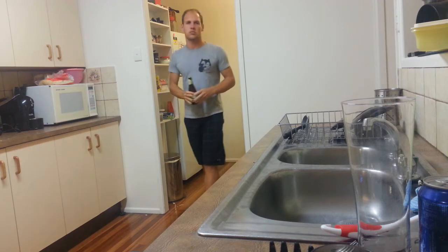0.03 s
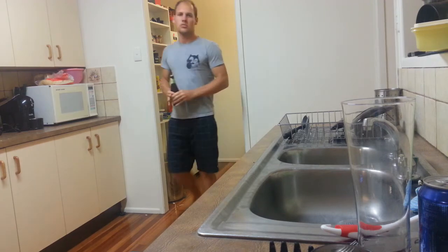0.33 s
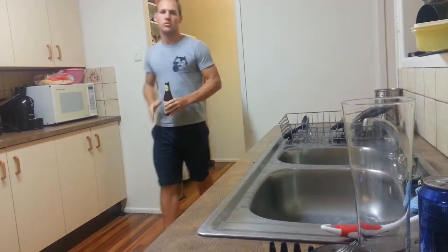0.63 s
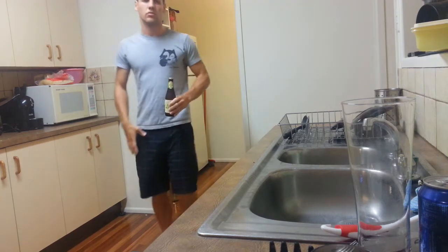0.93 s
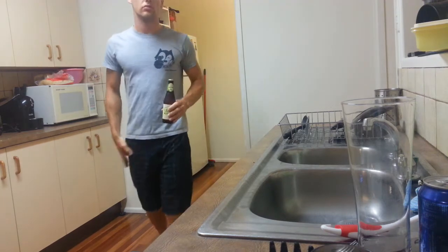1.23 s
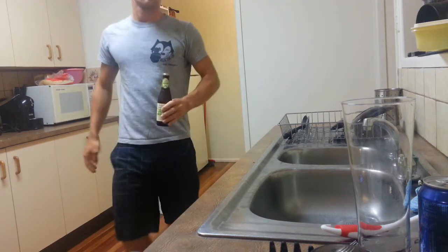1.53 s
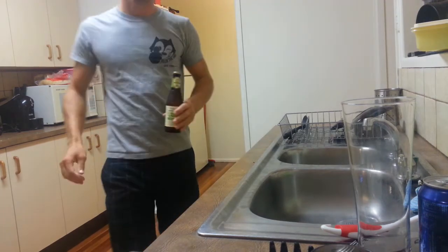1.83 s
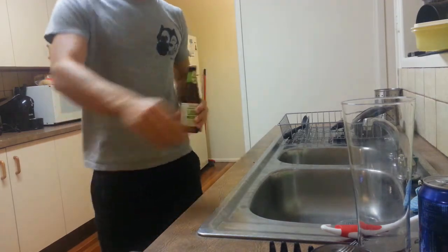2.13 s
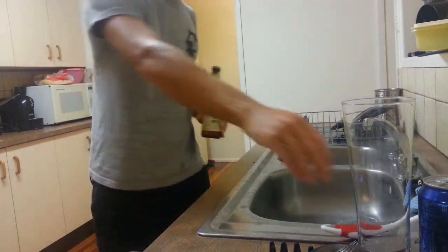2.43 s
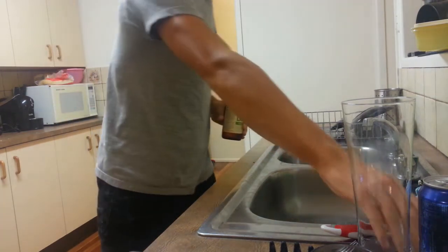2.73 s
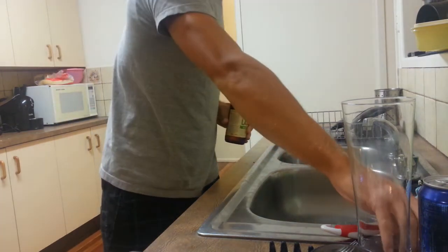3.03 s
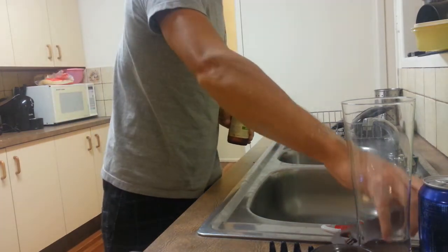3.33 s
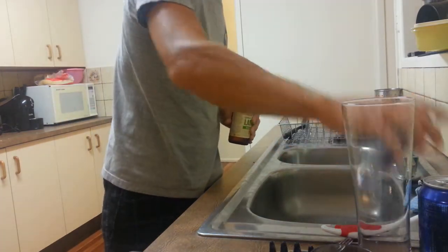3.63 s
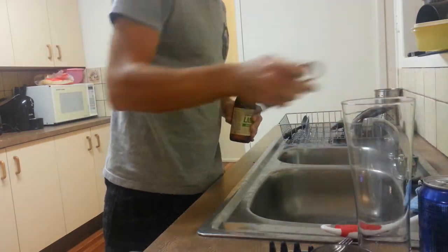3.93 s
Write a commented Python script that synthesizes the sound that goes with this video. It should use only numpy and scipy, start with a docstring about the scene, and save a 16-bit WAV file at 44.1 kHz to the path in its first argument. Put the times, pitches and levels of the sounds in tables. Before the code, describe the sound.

A metal utensil clinks at a sink in a small kitchen, after footsteps. For the first 2 seconds, bare feet thud on wooden boards while soles and clothes brush. Dull bumps start at 2.6 seconds. From 2.9 to 3.3 seconds metal clinks against glass, and around 3.4 seconds the utensil judders over steel and rings briefly. A faint hiss lies underneath.

```python
"""A small, hard kitchen. Someone walks barefoot over the wooden floor to a steel sink: heels thud,
boards knock, soles and clothes brush. A hand bumps among the things on the drainer, metal clinks
against glass, and a utensil judders over the steel in stick and slip, ringing as it comes free.
Behind it lie still air, hiss and a faint far tone; the microphone rings near 7 kHz."""
import sys
import numpy as np
from scipy import signal
from scipy.fft import rfft, irfft
from scipy.io import wavfile

SR = 44100
rng = np.random.default_rng(int(sys.argv[2]) if len(sys.argv) > 2 else 0)


def persist_wave(psi):
    """Save psi, clipped to +-1, as 16-bit WAV."""
    counts = np.round(np.clip(psi, -1, 1) * 32767).astype(np.int16)
    wavfile.write(sys.argv[1], SR, np.atleast_2d(counts).T)


N = 176400


def from_db(db):
    """Decibels to gain."""
    return np.exp(np.asarray(db) * (np.log(10) / 20))


def unit(x):
    """Scale to a mean energy of one per channel."""
    return x / np.sqrt(np.mean(np.sum(x ** 2, axis=-1)) + 1e-20)


def pan(db):
    """Stereo gains for a left-minus-right level."""
    return from_db(np.array([db, -db]).reshape(2, -1) / 2)


def convolve(x, response):
    """Apply an impulse response; keep N samples."""
    x, response = np.atleast_2d(x).astype("f"), np.atleast_2d(response).astype("f")
    return signal.fftconvolve(x, response, axes=-1)[:, :N].astype(float)


def colour(spectrum, size=4096):
    """Minimum-phase impulse response from (Hz, dB) points on a log-frequency axis."""
    hz, db = np.transpose(spectrum)
    bins_hz = np.fft.rfftfreq(size, 1 / SR)
    gain = from_db(np.interp(np.log(bins_hz + 1), np.log(hz), db))
    cepstrum = irfft(np.log(gain))
    cepstrum[1:size // 2] *= 2
    cepstrum[size // 2 + 1:] = 0
    return irfft(np.exp(rfft(cepstrum)))


def clicks(times_s, levels_db):
    """One impulse per contact."""
    out = np.zeros(N)
    np.add.at(out, np.clip((np.asarray(times_s) * SR).astype(int), 0, N - 1), from_db(levels_db))
    return out


def decay(t60_s):
    """One second of exponential decay."""
    return from_db(np.maximum(-60 * np.arange(SR) / SR / t60_s, -160))


def diffuse(count, crossover_hz=450):
    """Diffuse-field stereo noise: alike in the bass, unrelated in the treble."""
    mid, side = rng.standard_normal((2, count))
    low, high = (signal.butter(1, crossover_hz, kind, fs=SR) for kind in ("low", "high"))
    mid = mid + (np.sqrt(2) - 1) * signal.lfilter(*low, mid)
    side = signal.lfilter(*high, side)
    return np.stack([mid + side, mid - side]) / np.sqrt(2)


def dense_ring(t60_s, attack_s):
    """Many close modes that build up and die together."""
    onset = 1 - np.exp(-(np.arange(SR) / SR / attack_s) ** 2)
    return unit(diffuse(SR) * decay(t60_s) * onset)


def knocks(times_s, levels_db, spectrum, t60_s, attack_s):
    """Blows on a many-mode body; each hits another spot and has its own colour."""
    out = np.zeros((2, N + SR))
    for time_s, gain in zip(times_s, from_db(levels_db)):
        start = int(time_s * SR)
        out[:, start:start + SR] += gain * dense_ring(t60_s, attack_s)
    return convolve(out, unit(colour(spectrum)))


def resonator(x, hz, t60_s):
    """Two-pole mode: a unit click leaves a dying sine of unit energy."""
    r, w = from_db(-60 / (t60_s * SR)), 2 * np.pi * hz / SR
    gain = np.sin(w) * np.sqrt(2 * (1 - r * r))
    return signal.lfilter([0, gain], [1, -2 * r * np.cos(w), r * r], x + 1e-18)


def jolted_mode(contacts, hz, t60_s, jolt_rad=0.9):
    """Each contact adds energy and jolts the phase, so the ring is rough while contacts last."""
    retained = from_db(-120 / (t60_s * SR))
    energy = signal.lfilter([1], [1, -retained], contacts ** 2 + 1e-24)
    phase = np.cumsum(jolt_rad * contacts / np.sqrt(energy) * rng.standard_normal(N))
    return np.sqrt(2 * (1 - retained) * energy) * np.sin(2 * np.pi * hz * np.arange(N) / SR + phase)


def kitchen(x, room_db):
    """Direct sound plus the tail of the hard room."""
    return x + from_db(room_db) * convolve(x, dense_ring(t60_s=0.35, attack_s=0.0022))


# Spectrum of still air and microphone hiss: (frequency [Hz], relative level [dB])
AIR_SPECTRUM = [(25, -24.5), (70, -1), (170, 2), (330, 0), (600, -4.5), (900, -10), (2000, -15),
                (5500, -14.5), (9000, -16), (14000, -17)]


def air(level_db=-67.5, peak_hz=7190, peak_width_hz=45.8, peak_db=-79.5):
    """Quiet room and microphone hiss with one narrow peak."""
    peak = signal.lfilter(*signal.iirpeak(peak_hz, peak_hz / peak_width_hz, fs=SR), diffuse(N))
    noise = convolve(diffuse(N), unit(colour(AIR_SPECTRUM)))
    return from_db(level_db) * noise + from_db(peak_db) * peak / peak.std()


# Course of the far tone: (time [s], pitch [Hz], level [dB])
FAR_TONE = [(.75, 560, -74), (1.15, 635, -74), (1.351, 596, -66), (1.5, 585, -66), (1.579, 566, -90)]


def far_tone(waver_hz=12.5):
    """A faint, wavering tone that rises and sinks."""
    times_s, hz, db = np.transpose(FAR_TONE)
    t = np.arange(N) / SR
    waver = signal.sosfilt(signal.butter(2, waver_hz, fs=SR, output="sos"), rng.standard_normal(N))
    envelope = np.interp(t, times_s, from_db(db), left=0, right=0)
    phase = 2 * np.pi * np.cumsum(np.interp(t, times_s, hz)) / SR
    return envelope * waver / waver.std() * np.sin(phase)


# Strokes of soles and clothes: (peak time [s], level [dB], rise [s], fall [s])
BRUSHES = [(0.072, -58.5, 0.007, 0.021), (0.557, -46.5, 0.017, 0.034), (0.787, -57, 0.026, 0.039),
           (1.136, -62.5, 0.011, 0.22), (1.274, -39.5, 0.0057, 0.0095), (1.295, -44.5, 0.026, 0.07),
           (1.345, -36.5, 0.0043, 0.011), (1.39, -48.5, 0.069, 0.018), (1.941, -46.5, 0.016, 0.017),
           (2.306, -56, 0.014, 0.031), (2.596, -56.5, 0.016, 0.023), (2.828, -54.5, 0.011, 0.08),
           (2.912, -49, 0.025, 0.069)]
# Rubbing spectrum: (frequency [Hz], relative level [dB])
BRUSH_SPECTRUM = [(100, -9), (250, -4.5), (900, -4.5), (1700, -6.5), (2500, -3.5), (3800, 0.5), (5000, 0.5),
                  (7300, 2.5), (9000, -5.5), (14000, -11)]


def brushes(grains_per_s=12000, spread_db=0.5):
    """Skin and cloth let go in tiny grains under a quick swell and fade."""
    t = np.arange(0, N / SR, 0.001)
    power = 0
    for peak_s, db, rise_s, fall_s in BRUSHES:
        before_s, after_s = np.minimum(t - peak_s, 0), np.maximum(t - peak_s, 0)
        power += (from_db(db) * np.exp(-(before_s / rise_s) ** 2 - after_s / fall_s)) ** 2
    envelope = np.sqrt(N * np.interp(np.arange(N) / SR, t, power + 1e-18))
    releases = rng.random(N) < grains_per_s / SR
    sizes = from_db(spread_db * np.minimum(rng.exponential(1, N), 3))
    grains = unit(releases * sizes * diffuse(N))
    rub = convolve(grains * envelope, unit(colour(BRUSH_SPECTRUM)))
    return kitchen(rub, room_db=-7) * pan(db=1.5)


# Heel and ball landings: (time [s], relative boom level [dB], relative knock level [dB])
FOOTFALLS = [(0.067, -38, -38), (0.666, -14.5, -23), (.760, -38, -24.5), (1.239, -16, -17),
             (1.257, -12.5, -23), (1.338, -20.5, -14), (1.815, -16, -21), (1.872, -17, -24),
             (1.940, -29.5, -27.5)]
# Floorboard knock: (frequency [Hz], relative level [dB])
BOARD_SPECTRUM = [(40, -7), (100, -5), (155, 3.5), (260, -4.5), (400, -10), (600, -10.5), (1000, -17),
                  (2000, -27), (6000, -56)]


def footfalls(boom_hz=63.7, heel_band_hz=(40, 150)):
    """A soft push bends the floor, which booms briefly while the boards knock."""
    times_s, boom_db, knock_db = np.transpose(FOOTFALLS)
    floor_mode = np.sin(2 * np.pi * boom_hz * np.arange(SR) / SR) * decay(t60_s=0.078)
    push = signal.sosfilt(signal.butter(1, heel_band_hz, "band", fs=SR, output="sos"), floor_mode)
    boom = convolve(clicks(times_s, boom_db), -unit(push)) * pan(db=-3)
    knock = knocks(times_s, knock_db - 2, BOARD_SPECTRUM, t60_s=0.2, attack_s=0.0029)
    return kitchen(boom, room_db=-8) + kitchen(knock, room_db=3.5)


# Bumps on the drainer: (time [s], level [dB])
BUMPS = [(2.608, -23.5), (2.885, -30.5), (2.915, -21.5), (2.936, -17.5), (2.96, -18.5), (3.16, -25),
         (3.402, -16.5), (3.495, -17)]
# Hollow body: (frequency [Hz], relative level [dB])
HOLLOW_SPECTRUM = [(90, -12.5), (170, -2.5), (370, -1), (600, -4.5), (900, -13), (2500, -23.5)]


def bumps():
    """Hand and utensil knock dully against hollow things."""
    thuds = knocks(*np.transpose(BUMPS), HOLLOW_SPECTRUM, t60_s=0.13, attack_s=0.001705)
    return kitchen(thuds, room_db=-4.5)


# Utensil modes: (frequency [Hz], knocked level [dB], dragged level [dB], t60 [s], left-right [dB])
UTENSIL_MODES = [(1319, -16.5, -9.5, .2, 7), (1545, -18.5, -19, .55, 7.5), (1918, -19.5, -6.5, 0.158, 5.5),
                 (3310, -34.5, -21, .55, 8.5), (4260, -8, -5.5, 0.27, 6), (5700, -4, -7, 0.25, 2),
                 (6814, -4, -16, 0.29, -12), (7510, -9.5, -21, .2, -5), (7876, -10, 1.5, 0.18, -8),
                 (9670, -9, -5.5, 0.22, 1), (11970, -16, -11, .1, -4.5)]


def knocked_ring(contacts, gain_db=-5, pitch_ratio=1.005):
    """The utensil's modes, slightly sharp while it still lies on the drainer."""
    return sum(from_db(gain_db + db) * pan(pan_db) * jolted_mode(contacts, hz * pitch_ratio, t60_s)
               for hz, db, _, t60_s, pan_db in UTENSIL_MODES)


def dragged_ring(slips, chatter, gain_db=-13, chatter_cutoff_hz=7000):
    """Slips drive all the utensil's modes; the light chatter hardly reaches the highest."""
    ring = 0
    for hz, _, db, t60_s, pan_db in UTENSIL_MODES:
        contacts = slips + chatter / (1 + (hz / chatter_cutoff_hz) ** 4)
        ring += from_db(gain_db + db) * pan(pan_db) * jolted_mode(contacts, hz, t60_s)
    return ring


# Utensil on glass: (time [s], clatter level [dB], damped clink level [dB], free ring level [dB])
CLINKS = [(2.936, -16.5, -20, -34), (2.960, -12, -10, -27.5), (2.9635, -17.5, -13, -27.5),
          (2.969, -19.5, -16.5, -27), (3.036, -27, -26, -33), (3.135, -20, -20.5, -29.5),
          (3.160, -16.5, -15.5, -27.5), (3.195, -27.5, -23, -29), (3.2565, -28, -13, -19.5),
          (3.260, -7.5, -7, -5), (3.323, -11.5, -28, -33.5)]
# Contact clatter: (frequency [Hz], relative level [dB])
CLATTER_SPECTRUM = [(70, -20), (170, -1.5), (400, -8), (900, 0), (1200, -4.5), (1500, 2.5), (2800, 1.5),
                    (3600, -8), (5000, -3.5), (6200, -2), (8500, -7.5), (11500, -12), (14000, -24.5)]
# Utensil modes when pinned under the fingers: (frequency [Hz], relative level [dB], t60 [s])
PINNED_MODES = [(2770, -13.5, 0.016), (4470, -5, 0.018), (5770, -5, 0.015), (6140, -11.5, .012),
                (7110, -11.5, 0.0072), (7850, -8.5, .014), (9450, -14.5, 0.012)]


def clinks():
    """Metal hits glass: a short clatter, a damped clink and what free ring the fingers allow."""
    times_s, clatter_db, clink_db, free_db = np.transpose(CLINKS)
    clatter = knocks(times_s, clatter_db, CLATTER_SPECTRUM, t60_s=0.03, attack_s=0.00079)
    taps = knocks(times_s, clink_db, [(1, 0)], t60_s=0.01, attack_s=0.00044)  # flat spectrum
    clink = sum(from_db(db) * resonator(taps, hz, t60_s) for hz, db, t60_s in PINNED_MODES)
    impacts = clatter * pan(db=4) + clink * pan(db=-2.5)
    ring = knocked_ring(clicks(times_s, free_db))
    return kitchen(impacts, room_db=2.5) + kitchen(ring, room_db=0.5)


def smear(ticks, centre_hz=2750, width_hz=2570, left_lag_s=0.00033):
    """The sheet spreads each tick over a few cycles, which reach the left side later."""
    r = np.exp(-np.pi * width_hz / SR)
    poles = [1, -2 * r * np.cos(2 * np.pi * centre_hz / SR), r * r]
    allpass = poles[::-1] + poles
    stereo = np.vstack([np.roll(ticks, int(left_lag_s * SR)), ticks])
    return signal.sosfilt([allpass, allpass], stereo)


# Tick on steel: (frequency [Hz], relative level [dB])
STEEL_SPECTRUM = [(40, -58.5), (90, -21), (200, -6.5), (350, -22), (700, -4), (1150, -5.5), (1400, 2),
                  (1750, -3.5), (2550, 1.5), (3600, -6), (5000, -9.5), (6300, -10.5), (8000, -19),
                  (11000, -40.5), (14000, -57)]
# Stereo balance of the sink: (frequency [Hz], left-right [dB])
SINK_BALANCE = [(100, 3), (300, 12), (700, 3), (2500, 1), (5500, 1), (7200, -8), (10000, -13.5)]


def steel_sheet(contacts, ring_db=-4.5):
    """The sink answers each contact with a sharp tick and a short, dense ring."""
    ticks = convolve(contacts, unit(colour(STEEL_SPECTRUM)))
    ring = convolve(ticks, dense_ring(t60_s=0.032, attack_s=0.003))
    steel = kitchen(smear(ticks) + from_db(ring_db) * ring, room_db=-5)
    balance = [colour([(hz, side * db / 2) for hz, db in SINK_BALANCE]) for side in (1, -1)]
    return convolve(steel, balance)


# Slips of the utensil on the steel: (time [s], level [dB])
SLIPS = [(3.38, -9), (3.385, -5), (3.3897, -3.5), (3.3947, 0), (3.397, 1.5), (3.4039, 2.5), (3.4113, -0.5),
         (3.419, -11), (3.426, -7.5), (3.43, -2.5), (3.432, -4), (3.4358, 0), (3.4641, -4.5), (3.473, -7),
         (3.4879, -12)]
# Envelope of the fine chatter: (time [s], level [dB])
CHATTER_ENVELOPE = [(3.405, -15.5), (3.42, -10.5), (3.45, -12.5), (3.48, -8), (3.504, -12.5), (3.53, -28),
                    (3.572, -27)]


def judder(chatter_per_s=260, jitter_periods=0.35, spread_db=3.5, basin_db=-25):
    """Stick and slip ticks on the steel, drums the basin and keeps the utensil ringing."""
    envelope_s, envelope_db = np.transpose(CHATTER_ENVELOPE)
    grid_s = np.arange(envelope_s[0], envelope_s[-1], 1 / chatter_per_s)
    time_scatter, level_scatter = rng.standard_normal((SR, 2))[:len(grid_s)].T
    chatter_s = grid_s + jitter_periods * time_scatter / chatter_per_s
    chatter_db = np.interp(grid_s, envelope_s, envelope_db) + spread_db * level_scatter
    chatter = clicks(chatter_s, chatter_db)
    slips = clicks(*np.transpose(SLIPS))
    steel = steel_sheet(slips + chatter)
    ring = dragged_ring(slips, chatter)
    basin = from_db(basin_db) * jolted_mode(slips, hz=232, t60_s=0.16) * pan(db=3)
    return steel + kitchen(ring + basin, room_db=-1.5)


def scene():
    """Steps, then the hand at the sink, over a quiet background."""
    return footfalls() + brushes() + bumps() + clinks() + judder() + air() + far_tone()


# Microphone port resonance: (frequency [Hz], width [Hz], gain [dB])
MIC_PEAKS = [(6990, 430, 6)]


def record(dry, cutoff_hz=14450):
    """The microphone port resonates in the treble; a steep low-pass cuts the top."""
    for hz, width_hz, db in MIC_PEAKS:
        resonance = signal.lfilter(*signal.iirpeak(hz, hz / width_hz, fs=SR), dry)
        dry = dry + (from_db(db) - 1) * resonance
    return signal.sosfilt(signal.ellip(10, 0.2, 80, cutoff_hz, fs=SR, output="sos"), dry)


dry = scene()
out = record(dry)
persist_wave(out)
```